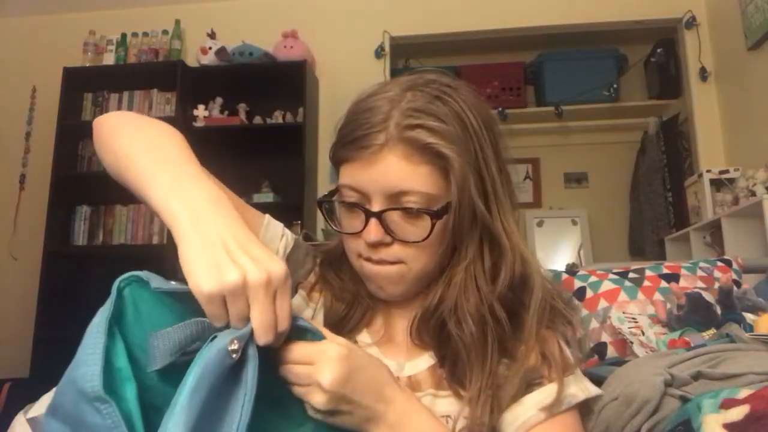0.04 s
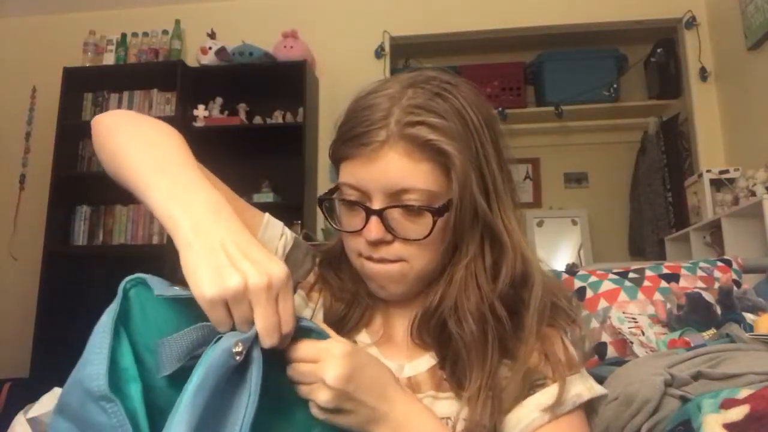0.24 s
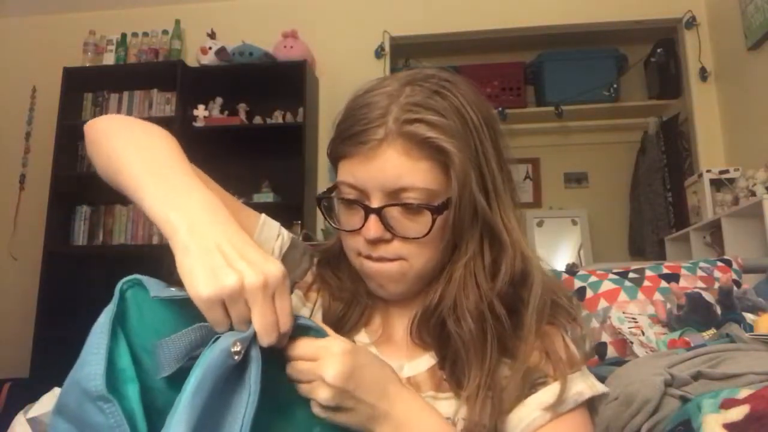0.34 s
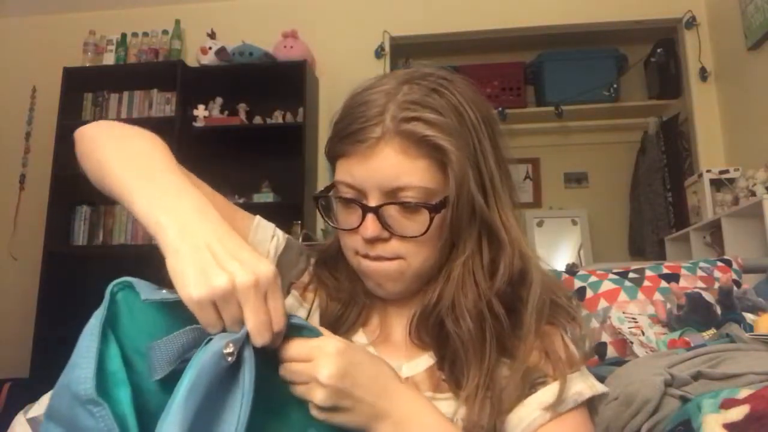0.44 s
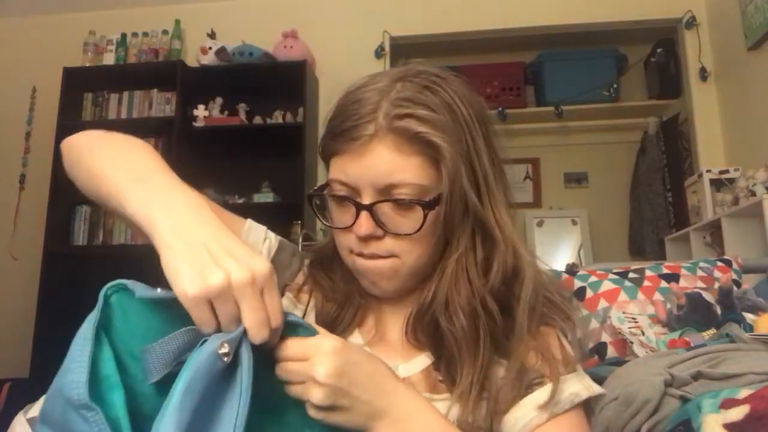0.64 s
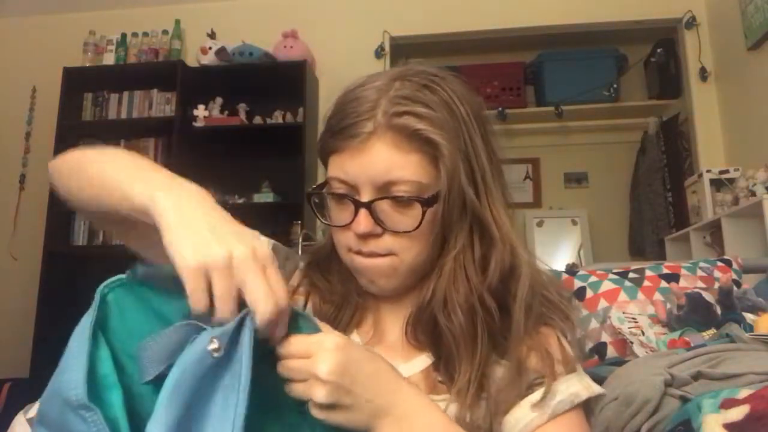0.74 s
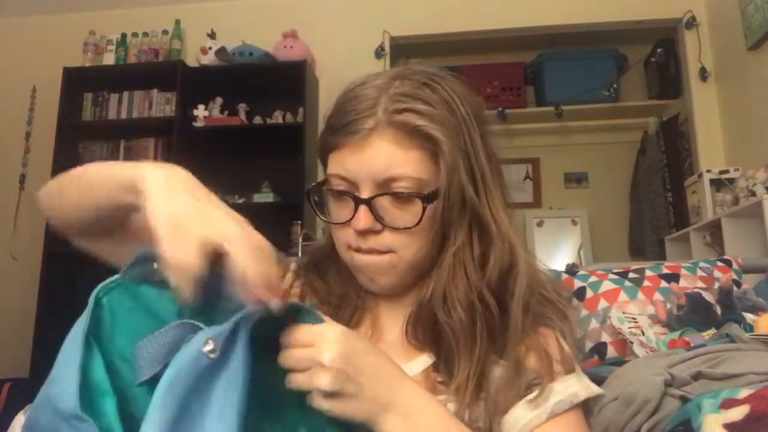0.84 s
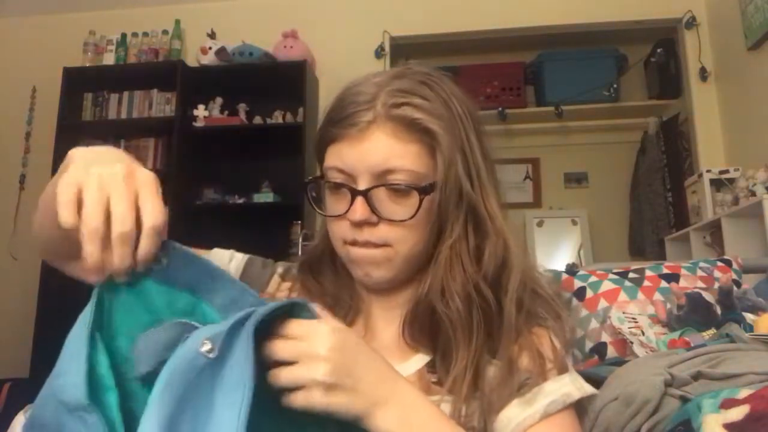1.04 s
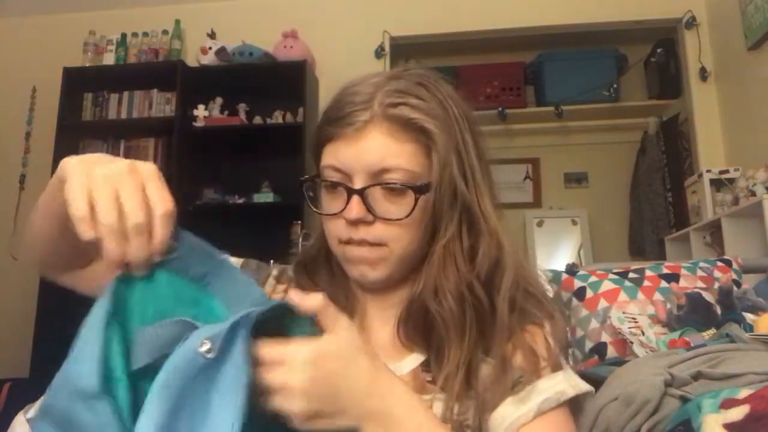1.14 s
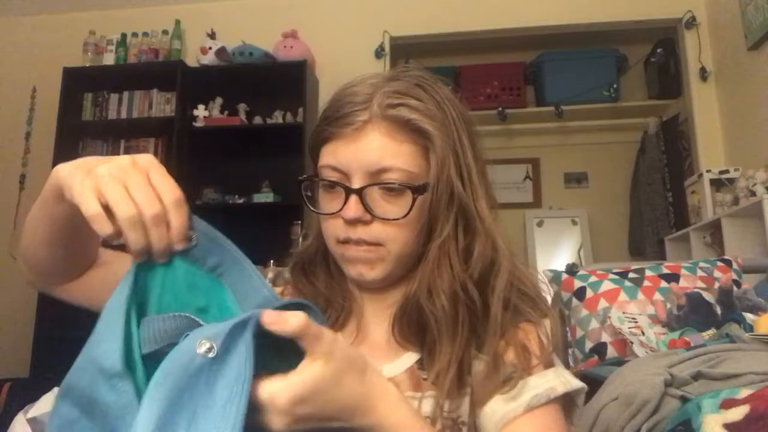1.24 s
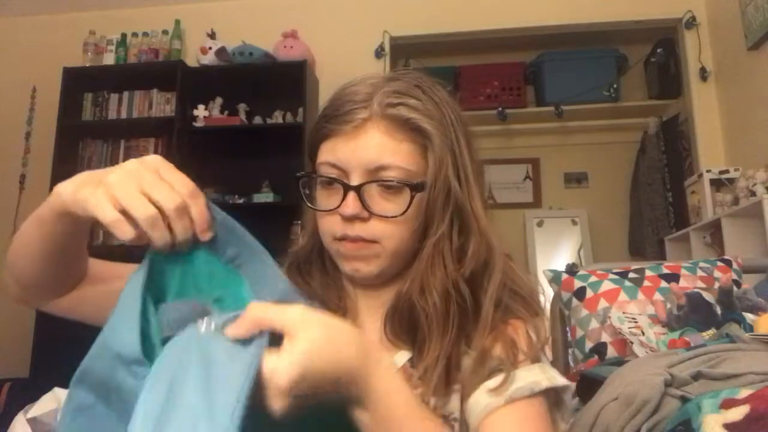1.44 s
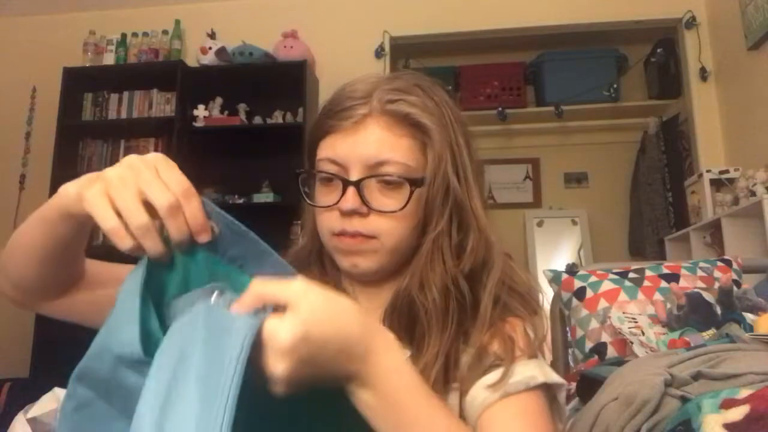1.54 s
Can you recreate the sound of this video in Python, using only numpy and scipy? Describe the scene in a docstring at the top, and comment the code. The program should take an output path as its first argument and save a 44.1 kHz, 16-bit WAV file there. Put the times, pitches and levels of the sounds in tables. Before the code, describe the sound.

Close up indoors, a snap fastener is pressed shut with a hard, bright click and a short room tail. Faint fabric rustle follows, then busier swishing, crinkly ticks and soft thuds over low hiss.

```python
"""In a furnished bedroom, a metal snap button on a fabric bag is pressed shut close to a small microphone.
The stud slips, then seats with a sharp clack: short pushes ring damped modes, with noise cracks and a
diffuse room tail. Nylon rubs and swishes throughout as grainy noise, more busily as hands shift the bag.
Creases tick as brief damped sines, and one faint squeak rings on longer; folds thud softly as low
tone bursts, and under it all lie a quiet hiss of shaped noise and a faint sine of mains hum."""
import sys
import numpy as np
from scipy import signal
from scipy.fft import rfft, irfft
from scipy.io import wavfile
from scipy.ndimage import uniform_filter1d

SR = 44100
rng = np.random.default_rng(int(sys.argv[2]) if len(sys.argv) > 2 else 0)


def wav_out(sig):
    """Save sig, one row per channel (or a flat mono array), as 16-bit PCM at SR to the path in sys.argv[1]."""
    wavfile.write(sys.argv[1], SR, np.round(np.clip(np.atleast_2d(sig).T, -1, 1) * 32767).astype(np.int16))


N = 70560  # samples, 1.6 s


def undb(db):
    """Amplitude ratio: 20 dB is a factor of ten in gain."""
    return 10 ** (np.asarray(db) / 20)


def colour(x, shape):
    """Spectral shaping: weight a signal by (pitch_hz, level_db) points and bring it to rms 1."""
    hz, db = np.array(shape, float).T
    f = np.maximum(np.arange(len(x) // 2 + 1) * SR / len(x), 1)
    # straight lines over log frequency, with a 29 dB drop below the first point
    gain = undb(np.interp(np.log(f), np.log(hz), db, left=db[0] - 29))
    y = irfft(rfft(x) * gain, len(x))
    return y / np.sqrt(np.mean(y ** 2))


def walk(rate):
    """Random modulation: Gaussian levels, `rate` per second, smoothed by two moving averages."""
    hold = int(SR / rate)
    steps = np.repeat(rng.standard_normal(N // hold + 1), hold)
    smooth = uniform_filter1d(uniform_filter1d(steps, hold), hold)
    return 0.83 * smooth[:N]


def since(s):
    """Causal time: seconds after a moment, zero before it."""
    return np.maximum(np.arange(N) / SR - s, 0)


def fade(t, t60):
    """Exponential decay: the level falls 60 dB in t60 seconds, from t = 0."""
    return (t > 0) * np.exp(-np.log(1000) * t / t60)


def half_octaves(x):
    """Filter bank: overlapping bands half an octave apart that sum back to the signal up to 20 kHz."""
    spectrum = rfft(x)
    f = np.maximum(np.arange(N // 2 + 1) * SR / N, 20)
    position = 2 * np.log2(f / 20)
    return [irfft(spectrum * np.maximum(1 - abs(position - k), 0), N) for k in range(21)]


# spectrum of the room and microphone hiss: pitch_hz [Hz], level_db [dB per Hz, relative]
HISS_SPECTRUM = [(25, -21), (33, -7), (45, -3), (80, -3.5), (149, -5.5), (250, -6.5), (400, -9),
                 (575, -11.5), (1070, -11.5), (1520, -18), (2500, -22), (4000, -21), (5100, -29.5),
                 (6300, -28.5), (8000, -23.5), (10500, -30), (13000, -26), (16000, -27.5)]
HISS_DB = -67  # rms
HUM_HZ, HUM_DB = 120, -78.5  # rms


def floor():
    """Stationary background: shaped Gaussian noise plus a steady sine of mains hum."""
    hiss = undb(HISS_DB) * colour(rng.standard_normal(N), HISS_SPECTRUM)
    hum = undb(HUM_DB) * np.sqrt(2) * np.sin(2 * np.pi * HUM_HZ * np.arange(N) / SR)
    return hiss + hum


# soft thuds of the bag: centre_s [s], level_db [dB], pitch_hz [Hz]
THUDS = [(.01, -63, 48.3), (0.199, -54.5, 332), (.253, -57, 230), (.256, -56.5, 109), (.285, -64, 75.4),
         (0.769, -57, 83.6), (.95, -64, 89.5), (0.965, -57, 99), (1.009, -60.5, 44.4), (1.158, -63.5, 59.6),
         (1.301, -65, 87), (1.432, -62.5, 113)]
THUD_CYCLES = 1.05  # from the centre to 1/e of the envelope


def thuds():
    """Heavily damped motion: low sines swell and fade in a Gaussian envelope of a few cycles."""
    out = 0
    for s, db, hz in THUDS:
        t = np.arange(N) / SR - s
        envelope = np.exp(-(t * hz / THUD_CYCLES) ** 2)
        out = out + undb(db) * np.sin(2 * np.pi * hz * t) * envelope
    return out


# creases and hardware that tick, and one long faint squeak at 936 Hz:
# start_s [s], level_db [dB], pitch_hz [Hz], ring_cycles [cycles in which the ring decays by e^-3],
# edge_db [dB, bright edge relative to level_db]
TICKS_AND_SQUEAK = [(.066, -52.5, 1195, 3.8, -30), (0.194, -50, 1360, 3.6, -6),
                    (.727, -50.5, 1090, 5.3, -1.5), (0.7398, -48, 3400, 11, -4),
                    (0.7611, -38.5, 3400, 6.2, -8), (.777, -47, 680, 3, -7), (.798, -49, 680, 3.1, -16),
                    (0.926, -55, 420, 7.6, -18), (1.0183, -61, 1780, 6.7, -14),
                    (1.0185, -50, 3620, 4.3, -10.5), (1.0575, -52.5, 4140, 4, -23),
                    (1.063, -51.5, 1710, 7, -15), (1.075, -53, 1550, 4.9, -1),
                    (1.088, -50.5, 3730, 5.7, -6.5), (1.1346, -47.5, 1110, 6, -5),
                    (1.147, -50, 1670, 8.7, -10), (1.161, -43, 1590, 5.4, -22), (1.175, -43, 3370, 5, -16),
                    (1.1917, -44, 1480, 6.5, -18), (1.194, -46, 3500, 6.6, -20),
                    (1.222, -63, 936, 150, -20), (1.258, -49.5, 4200, 11, -8), (1.262, -53.5, 2390, 21, -1),
                    (1.334, -56, 436, 5.4, -17), (1.37, -52.5, 382, 3.7, -18),
                    (1.3843, -45.5, 4100, 3.5, -1), (1.3892, -36.5, 1400, 3.7, -30),
                    (1.404, -49.5, 452, 3.6, -20), (1.427, -39.5, 1060, 1.9, -25),
                    (1.43, -48.5, 4500, 4, -10), (1.527, -56, 485, 5, -18)]
TICK_RISE_CYCLES = .4  # time constant in cycles of the ring
TICK_EDGE_S, TICK_EDGE_HZ = 0.00063, 7000  # delay to the peak of the edge; where its treble starts to roll off
TICK_ROOM_DB, TICK_ROOM_T60_S = -18.5, .24


def ticks_and_squeak():
    """Damped resonance: each tick, or the longer squeak, is a ring with a noise edge and a trace of room."""
    edge_spectrum = [(500, -12), (2000, 0), (TICK_EDGE_HZ, -2), (10500, -12), (16000, -12)]
    noise = colour(rng.standard_normal(N), edge_spectrum)
    out = 0
    for s, db, hz, cycles, edge_db in TICKS_AND_SQUEAK:
        t = since(s)
        decay = np.exp(-t * hz * 3 / max(cycles, .5))
        rise = 1 - np.exp(-t * hz / TICK_RISE_CYCLES)
        ring = np.sin(2 * np.pi * hz * t) * decay * rise
        edge = noise * t / TICK_EDGE_S * np.exp(1 - t / TICK_EDGE_S)
        out = out + undb(db) * (2 * ring + undb(edge_db) * edge)
    t = np.arange(1, SR // 4) / SR
    room = rng.standard_normal(len(t)) * fade(t, TICK_ROOM_T60_S)
    room = room / np.sqrt(np.sum(room ** 2))  # unit energy
    return out + undb(TICK_ROOM_DB) * signal.fftconvolve(out, room)[:N]


# rubbing of the fabric, joined by straight lines: time_s [s], crumple_db [dB], rustle_db [dB], swish_db [dB]
RUB = [(0, -64, -68, -67), (.05, -74, -71, -75), (.12, -73, -77, -108), (.17, -63, -71, -92),
       (.23, -63.5, -69, -80), (.45, -71.5, -69, -73.5), (.66, -71.5, -70.5, -71),
       (.72, -64.5, -63.5, -67.5), (.76, -57.5, -61.5, -63.5), (.82, -65.5, -64.5, -63.5),
       (.9, -69.5, -67.5, -67), (0.929, -65, -64.5, -69), (1.0, -71.5, -69.5, -72),
       (1.045, -97, -74.5, -73), (1.06, -74, -59, -72.5), (1.1, -58, -62.5, -62),
       (1.114, -63.5, -66.5, -69), (1.148, -56.5, -55, -59), (1.2, -59.5, -56.5, -55),
       (1.26, -60.5, -53.5, -57), (1.291, -59.5, -57, -57), (1.322, -72.5, -64, -68),
       (1.391, -57, -62, -64), (1.45, -60.5, -65, -67), (1.53, -60.5, -61.5, -60.5),
       (1.6, -59, -60.5, -57.5)]
# spectra of low crumple, rustle and airy treble swish: pitch_hz [Hz], level_db [dB per Hz, relative]
CRUMPLE = [(120, -16), (250, -7.5), (420, -7), (700, -5.5), (1000, -3.5), (1500, -3), (2100, -9.5),
           (4000, -32.5)]
RUSTLE = [(500, -38), (1500, -5.5), (2100, -8), (2600, -2.5), (3600, -1), (5000, -6), (6400, -4),
          (8000, -14), (10500, -18), (16000, -26)]
SWISH = [(3000, -34), (6500, -3.5), (8500, -5.5), (10500, -10), (12000, -2.5), (13500, -3), (15000, -8),
         (16000, -1)]
GRAINS_PER_S, GRAIN_SCATTER_DB = 1100, 2.6  # scatter is the mean of an exponential spread
GRAIN_S, GRAIN_SHARE = .0012, .42  # decay time constant; share of grains against smooth hiss
FLICKER_DB, FLICKER_PER_S = 2.5, 30


def fabric():
    """Stick-slip friction: fibres slip in dense small grains over a smooth hiss; each band flickers."""
    time_s, *levels = np.array(RUB, float).T
    out = 0
    for spectrum, db in zip((CRUMPLE, RUSTLE, SWISH), levels):
        strength = undb(GRAIN_SCATTER_DB * rng.exponential(size=N))
        hits = (rng.random(N) < GRAINS_PER_S / SR) * strength
        grains = signal.lfilter([1], [1, -np.exp(-1 / (GRAIN_S * SR))], hits)
        envelope = 1 - GRAIN_SHARE + GRAIN_SHARE * grains / np.mean(grains)
        bands = half_octaves(colour(envelope * rng.standard_normal(N), spectrum))
        flickering = sum(b * undb(FLICKER_DB * walk(FLICKER_PER_S)) for b in bands)
        out = out + undb(np.interp(np.arange(N) / SR, time_s, db)) * flickering
    return out


# spectrum of the room's answer to the snap: pitch_hz [Hz], level_db [dB per Hz, relative]
ECHO = [(60, -31), (184, -15.5), (354, -6), (527, -9.5), (720, -1), (970, -2), (1450, -8), (1750, -5),
        (2190, -18), (3200, -10), (4300, -16), (5900, -7), (6500, -8.5), (7200, -14), (9500, -15.5),
        (10500, -24), (16000, -24)]
ECHO_DB, ECHO_RISE_S = -33, 0.0024  # rise is a time constant
ECHO_T60_LOW_S, ECHO_T60_HIGH_S = 0.16, .24  # lowest and highest band
ECHO_FLICKER_DB, ECHO_FLICKER_PER_S = 3.5, 120


def echo():
    """Diffuse reverberation: an uneven noise tail of the snap, in which the treble lasts longer."""
    t = since(SNAP[2][0])  # from the strongest contact
    bands = half_octaves(colour(rng.standard_normal(N), ECHO))
    t60s = np.linspace(ECHO_T60_LOW_S, ECHO_T60_HIGH_S, len(bands))
    tail = 0
    for band, t60 in zip(bands, t60s):
        flicker = undb(ECHO_FLICKER_DB * walk(ECHO_FLICKER_PER_S))
        tail = tail + band * fade(t, t60) * flicker
    return undb(ECHO_DB) * (1 - np.exp(-t / ECHO_RISE_S)) * tail


# contacts of the stud with its socket: start_s [s], level_db [dB], contact_ms [ms, delay to the peak push]
SNAP = [(.2411, -33, .015), (.2453, -25, .02), (.24565, -14, .02), (.24652, -19, .02)]
# what stud and taut fabric ring with: pitch_hz [Hz], level_db [dB], t60_s [s]
SNAP_MODES = [(580, -13.5, .02), (764, -5.5, 0.0086), (1002, -0.5, 0.015), (1475, 0.5, 0.014),
              (2050, -16, 0.014), (3140, -5, 0.0058), (3560, -2, 0.0055), (4340, -13, 0.013),
              (5440, -22, 0.037), (6300, -3.5, 0.0063), (7520, -7, 0.011), (8750, -6.5, 0.007),
              (9300, -7.5, .006), (12000, -10, 0.015), (13500, -18, .01), (14300, -7, .01),
              (15300, -4, .012)]
CRACK_DB, CRACK_T60_S, CRACK_TOP_HZ = -9, .012, 9740  # level relative to its contact
SNAP_CUT_HZ = 583  # so small a thing radiates no bass


def snap():
    """Modal excitation: short pushes ring the damped modes, and each adds a brief noise crack."""
    t = np.arange(SR // 10) / SR
    ring = -sum(undb(db) * np.sin(2 * np.pi * hz * t) * fade(t, t60) for hz, db, t60 in SNAP_MODES)
    push, crack_level = 0, 0
    for s, db, ms in SNAP:
        pulse = since(s) * np.exp(-since(s) * 1000 / ms)
        push = push + undb(db) * pulse / pulse.sum()
        crack_level = crack_level + undb(db + CRACK_DB) * fade(since(s), CRACK_T60_S)
    low_pass = signal.butter(4, CRACK_TOP_HZ, fs=SR, output="sos")
    crack = signal.sosfilt(low_pass, crack_level * rng.standard_normal(N))
    clack = signal.fftconvolve(push, ring)[:N] + crack
    high_pass = signal.butter(4, SNAP_CUT_HZ, "high", fs=SR, output="sos")
    return signal.sosfilt(high_pass, clack)


def scene():
    """Superposition: the pressures of all sources add at one microphone."""
    return (floor() + thuds() + ticks_and_squeak() + fabric() + echo() + snap())[None]


TOP_HZ = 15750


def record(dry):
    """Band limiting: the recorder cuts the top with a steep elliptic low-pass."""
    return signal.sosfilt(signal.ellip(10, .2, 60, TOP_HZ, fs=SR, output="sos"), dry)


dry = scene()
out = record(dry)
wav_out(out)
```